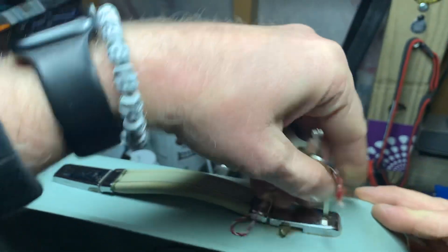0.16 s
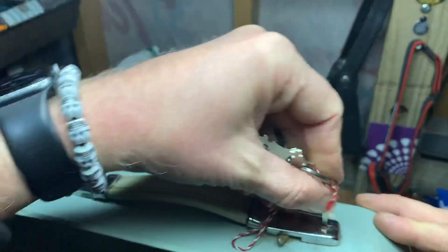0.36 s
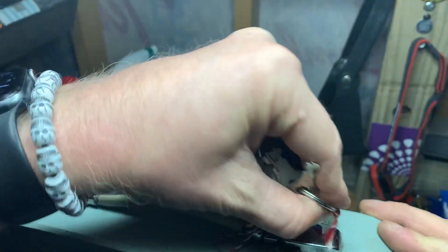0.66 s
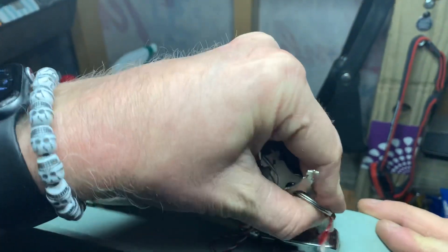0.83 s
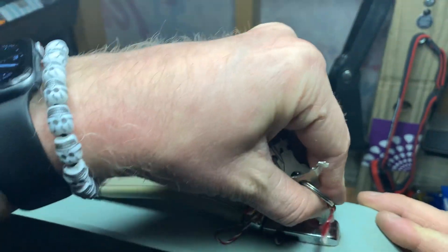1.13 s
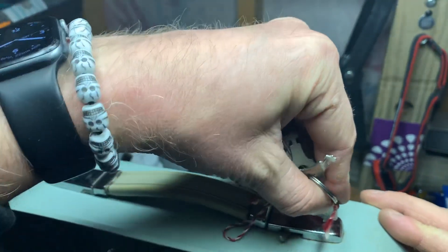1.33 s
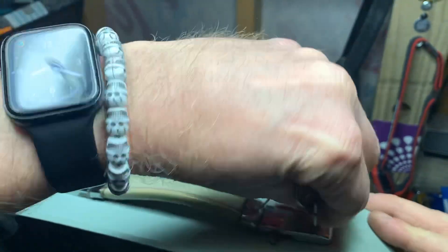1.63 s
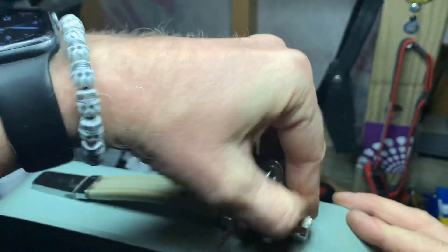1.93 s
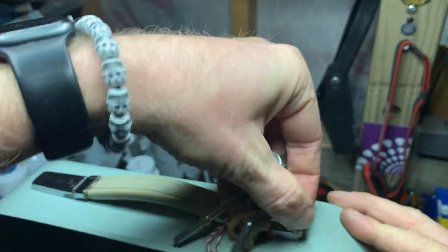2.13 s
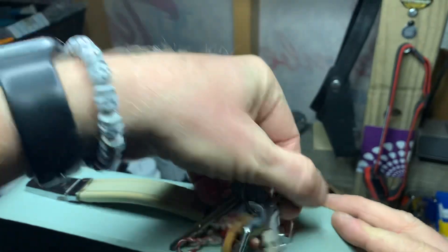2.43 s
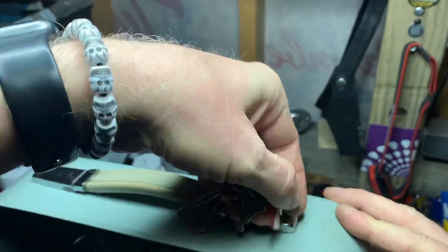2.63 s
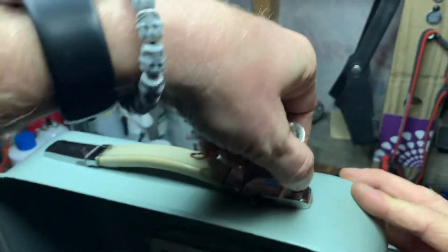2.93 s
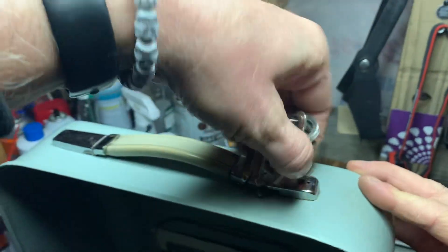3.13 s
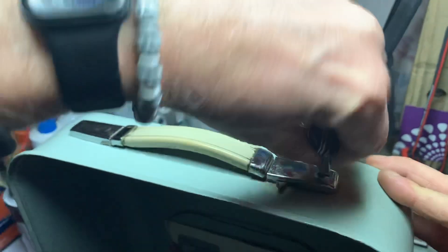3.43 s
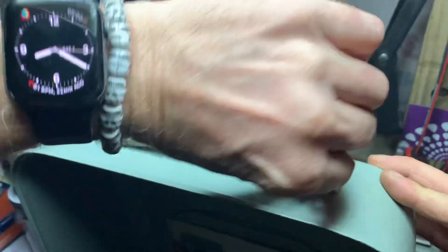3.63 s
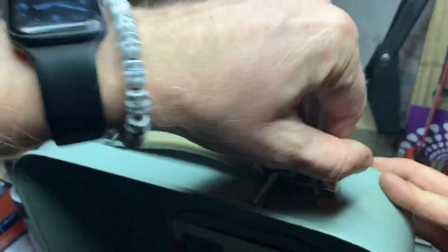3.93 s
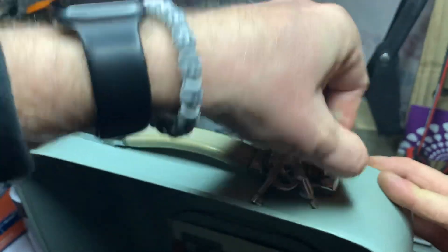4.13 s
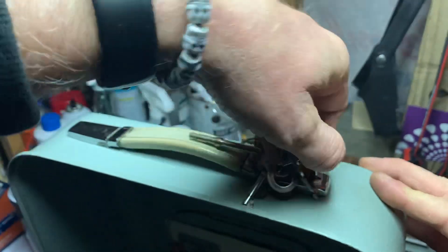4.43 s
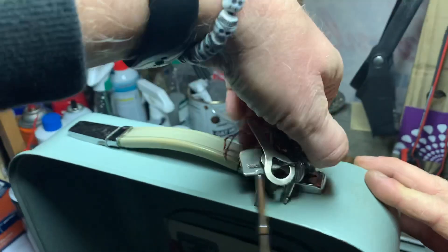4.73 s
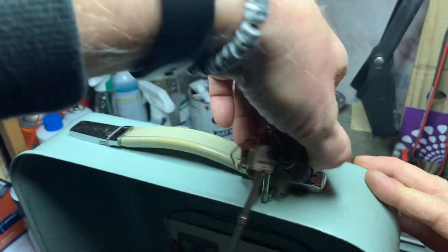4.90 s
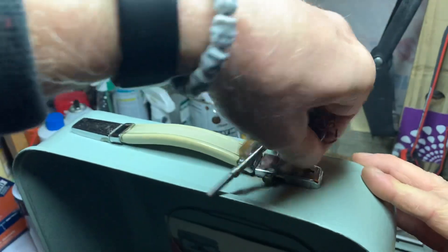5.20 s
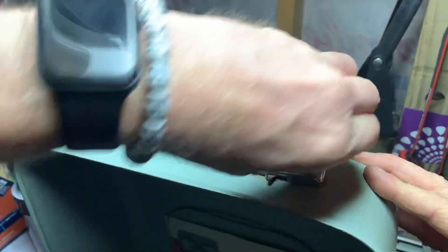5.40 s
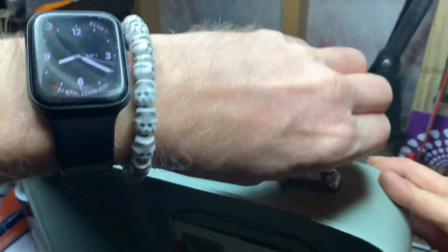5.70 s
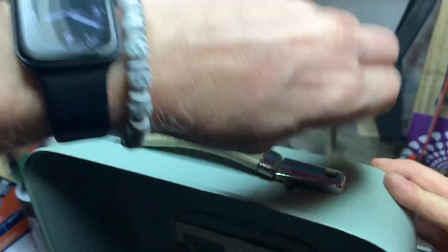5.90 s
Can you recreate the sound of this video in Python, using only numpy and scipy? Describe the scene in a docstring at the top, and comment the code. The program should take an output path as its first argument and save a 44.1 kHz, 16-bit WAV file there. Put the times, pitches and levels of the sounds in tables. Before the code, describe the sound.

A small key on a jangling bunch is worked in the metal lock of a hollow case, faint at first, then clattering and scraping.

```python
"""In a small room, close by, a small key on a bunch is worked in the metal lock of a hollow hard-shell case.
Each contact cracks, rings the lock plate and thumps the shell: bursts of noise and fading tones make these.
Between contacts the keys scrape, swing against each other and drag over the lid: random tiny
impulses and rattles keep the same bodies ringing. Short squeaks, clicks and pings join in.
The room adds a short tail, over a low steady rumble."""
import sys
import numpy as np
from scipy import signal
from scipy.fft import rfft, irfft
from scipy.io import wavfile
from scipy.ndimage import uniform_filter1d

SR = 44100
rng = np.random.default_rng(int(sys.argv[2]) if len(sys.argv) > 2 else 0)


def inscribe(sig):
    """Save sig as 16-bit PCM at rate SR to the path in sys.argv[1].

    A 1-D sig is mono; a 2-D sig holds one channel per row.
    Samples are clipped to [-1, 1] before scaling.
    """
    pcm = np.round(np.clip(np.atleast_2d(sig).T, -1, 1) * 32767)
    wavfile.write(sys.argv[1], SR, pcm.astype(np.int16))


N = 267113

# colour of ringing metal when it is hit: pitch_hz [Hz], relative level_db [dB per Hz]
CRACK = [(600, -14), (1800, -6), (2600, 6), (3300, 0), (4400, 6.5), (6300, 2), (8000, -9.5), (11000, -10.5),
         (16000, -29.5)]
# colour of its highest, glassy part: pitch_hz [Hz], relative level_db [dB per Hz]
GLINT = [(3000, -54.5), (6000, 1.5), (8000, 13), (10300, 8.5), (12000, 5.5), (13700, 2), (14600, 3),
         (15550, -11.5), (16200, -11)]
# the hanging keys by letter, each with its own ringing tones before any added damping or spread:
# pitch_hz [Hz], relative level_db [dB], t60_s, the time to fade by 60 dB [s]
FREE_KEYS = {"A": [(8200, -10.5, 0.13), (10070, -5.5, .1), (10490, -10, .1), (15550, 1.5, 0.08)],
             "B": [(8350, -21, 0.12), (9090, -10, .12), (10000, -10.5, 0.14), (11000, 2, 0.19),
             (13600, -6, 0.2), (14450, -1, 0.23)], "C": [(6525, -14, 0.31), (8156, -11, .3),
             (10060, -7.5, 0.17), (10430, -0.5, 0.21), (13460, -17, 0.11), (14530, -3, 0.18)],
             "D": [(6360, -2, 0.064), (8030, -2.5, 0.14), (12400, -9, .12), (12920, -8.5, 0.12),
             (14500, 2, 0.077), (15500, -3.5, .08)], "E": [(4619, -6, .3), (7241, -10, 0.37),
             (8830, -2.5, 0.1), (11800, -3.5, 0.22), (12600, 0, 0.33)], "F": [(3580, -2, 0.076),
             (7500, 0, 0.51), (12940, -1, .1), (15470, 7.5, 0.075)], "G": [(3790, -1, 0.14),
             (4590, -3, 0.15), (7235, -8, 0.29), (12540, -3.5, 0.18), (14870, -8.5, .24)]}

RING = np.arange(SR // 4) / SR  # time within one ring, s
GRIP_DETUNE = .011  # random pitch spread of plate and shell, as a fraction


def amp(db):
    """Turns decibels into a gain."""
    return 10 ** (np.asarray(db) / 20)


def unit(x):
    """Scales each channel to energy 1."""
    return x / np.sqrt(np.sum(x ** 2, -1, keepdims=True) + 1e-20)


def read(points, hz, axis=1):
    """Reads one column of a table, joined by straight lines over log frequency."""
    columns = np.transpose(points)
    return np.interp(np.log(hz + 1), np.log(columns[0]), columns[axis])


def add(mix, s, sound):
    """Adds a two-channel sound to the mix at time s, in seconds."""
    part = mix[:, max(round(s * SR), 0):][:, :sound.shape[1]]
    part += sound[:, :part.shape[1]]


def blow(db):
    """Size of a blow whose energy equals 10 ms at this level."""
    return amp(db) * np.sqrt(SR / 100)


def noise(spectrum, size, uneven_db=0):
    """Two channels of coloured noise; uneven_db lays random humps over the spectrum."""
    hz = np.fft.rfftfreq(size, 1 / SR)
    humps = np.interp(hz, np.linspace(0, SR / 2, 96), rng.standard_normal(96))
    gain = amp(read(spectrum, hz) + uneven_db * humps)
    return irfft(rfft(rng.standard_normal((2, size))) * gain, size)


def burst(spectrum, t60, rise, uneven_db):
    """Fading noise, like the many crowded, quickly damped tones of a small part; energy 1."""
    envelope = amp(-60 * RING / t60) * (1 - np.exp(-RING / rise))
    return unit(noise(spectrum, len(RING), uneven_db) * envelope)


def struck(modes, scatter_db, rise, detune=0):
    """A body rings; the place of the blow changes each tone's share, the grip its pitch; energy 1."""
    hz, db, t60 = np.transpose(modes)
    hz = hz * (1 + detune * rng.standard_normal(len(hz)))
    level = amp(db + scatter_db * rng.standard_normal(len(hz)))
    weight = level * np.exp(2j * np.pi * rng.random((2, len(hz))))  # each channel has its own phases
    angle = np.float32(2 * np.pi * np.outer(hz, RING))
    fade = np.exp(np.float32(-np.log(1000) * np.outer(1 / t60, RING)))
    ring = weight.real @ (fade * np.cos(angle)) + weight.imag @ (fade * np.sin(angle))
    return unit(ring * (1 - np.exp(-RING / rise)))


def knocks():
    """A knock cracks and rings the plate at once; the shell thumps just after."""
    # the key or the bunch knocks on the lock: start_s [s], blow on the lock plate plate_db [dB],
    # metal crack crack_db [dB], thump of the shell shell_db [dB]
    knock_list = [(0.565, -41, -70, -47.5), (0.7519, -41, -38, -34.5), (0.7661, -33, -34, -33.5),
                  (1.403, -65, -92, -61.5), (1.6015, -48, -54, -47), (1.6652, -44.5, -85, -80),
                  (2.1986, -29.5, -37, -36), (2.2184, -22, -27, -28), (2.2755, -34.5, -45.5, -36.5),
                  (2.338, -33.5, -29, -42), (2.457, -21, -28, -28), (2.598, -31, -45, -30),
                  (3.1238, -41, -51, -43), (3.306, -32, -39, -27), (3.469, -42, -52, -39),
                  (3.671, -41.5, -55.5, -37), (3.866, -54, -21.5, -28), (3.9, -25, -28, -31),
                  (3.926, -29.5, -35, -40), (4.273, -29, -29.5, -42.5), (4.47, -36, -37, -34.5),
                  (4.6483, -15.5, -24.5, -26.5), (4.7008, -22.5, -38, -40), (4.7416, -37.5, -37, -47.5),
                  (4.712, -23, -32.5, -23.5), (4.752, -27.5, -38, -48), (4.83, -32.5, -60, -35),
                  (5.259, -36, -45.5, -37.5), (5.0654, -28, -36.5, -29.5), (5.1212, -19.5, -21, -35.5),
                  (5.1498, -31, -27.5, -31.5), (5.418, -21, -25.5, -27), (5.5869, -28.5, -30, -29.5),
                  (5.7302, -44.5, -75.5, -39), (5.7906, -31, -31, -26), (5.8225, -31.5, -34, -40)]
    bright_db, shell_lag_s = -13, 0.00407  # glint relative to crack; the shell follows the plate
    out = np.zeros((2, N))
    for s, plate_db, crack_db, shell_db in knock_list:
        metal = metal_hit(bright_db, rise_s=0.002, crack_t60=0.06, glint_t60=0.06)
        add(out, s, blow(crack_db) * metal + blow(plate_db) * lock_ring())
        add(out, s + shell_lag_s, blow(shell_db) * shell_ring())
    return out


def metal_hit(bright_db, rise_s, crack_t60, glint_t60):
    """Metal hits metal: a sharp snap, its ringing crack and a high glint, with ringing keys."""
    low, high = key_ring()
    snap = amp(-3) * burst(CRACK, t60=.024, rise=.0015, uneven_db=4)
    ringing = amp(-1.5) * burst(CRACK, t60=crack_t60, rise=rise_s, uneven_db=10.5)
    crack = snap + ringing + amp(-9.5) * low
    glint = amp(-2.5) * burst(GLINT, t60=glint_t60, rise=rise_s, uneven_db=1.0) + amp(-24.5) * high
    return crack + amp(bright_db) * glint


def key_ring():
    """One key of the bunch rings: its low tones and its high tones, each group of energy 1."""
    # tones of the keys held in the hand, before a random pitch shift:
    # pitch_hz [Hz], relative level_db [dB], t60_s [s]
    key_modes = [(2690, -0.5, .03), (3617, 5.5, 0.037), (4340, 1.5, 0.062), (4470, 1.5, 0.056),
                 (4640, 7.5, 0.034), (5600, 7.5, 0.013), (6100, 1.5, 0.071), (6550, -2.5, 0.099),
                 (7900, 6.5, 0.06), (8370, 15, 0.11), (7900, 14, 0.04), (8800, 8, .06), (8850, 14, 0.06),
                 (9800, 0.5, 0.07), (10230, -2, .07), (10220, 6.5, .07), (12290, 6.5, 0.065),
                 (12700, 0, 0.15), (14560, -1.5, 0.08), (15530, -2, 0.046)]
    modes = np.array(key_modes) * [rng.uniform(.97, 1.03), 1, 1]
    high = modes[:, 0] > 7200
    return [struck(modes[part], scatter_db=4.5, rise=.0007) for part in (~high, high)]


def lock_ring():
    """The lock plate's tones, with the dense clatter of its loose parts."""
    # tones of the lock plate, before random spread: pitch_hz [Hz], relative level_db [dB], t60_s [s]
    plate_modes = [(735, -18, 0.22), (953, 0, 0.14), (1003.4, -4.5, 0.12), (1061, 4, 0.1), (1170, 3, 0.086),
                   (1228, 7, 0.082), (1307, 3.5, 0.1), (1630, 3.5, 0.022), (1785, -5, 0.09),
                   (2096, -5, 0.091)]
    # colour of the loose parts: pitch_hz [Hz], relative level_db [dB per Hz]
    clatter = [(300, -13.5), (700, 1.5), (1100, -4), (1550, 0), (2100, -2.5), (3000, -4), (6000, -28)]
    plate = struck(plate_modes, scatter_db=3, rise=.002, detune=GRIP_DETUNE)
    loose = burst(clatter, t60=.07, rise=.005, uneven_db=4)
    return amp(-3.0) * plate + amp(-6.0) * loose


def shell_ring():
    """The hollow shell answers more slowly than the metal."""
    # tones of the shell, before random spread: pitch_hz [Hz], relative level_db [dB], t60_s [s]
    shell_modes = [(105, -21, 0.075), (142.7, -7.5, 0.28), (212.5, 3.5, 0.16), (221.4, 1.5, 0.12),
                   (254.7, -7, 0.1), (326.3, -2.5, 0.15), (392.2, 3, 0.22), (448.2, 6.5, 0.12),
                   (510, -8, 0.22), (560.6, 6, 0.082), (570, -6.5, 0.058), (673.6, -5.5, 0.18)]
    return struck(shell_modes, scatter_db=3, rise=.004, detune=GRIP_DETUNE)


def shove(force):
    """How hard a light force on the lock plate moves the shell."""
    return amp(-14) * force ** 0.77  # a power below 1, so the shell also answers a light touch


def ticks():
    """Key ticks against key; a little of the blow passes through the key into plate and shell."""
    # start_s [s], level_db of the crack [dB], bright_db of the glint relative to it [dB]
    tick_list = [(0.086, -61, 7.5), (0.117, -55, -16), (0.1384, -49.5, 3), (0.256, -56.5, 10),
                 (0.306, -57.5, -1), (0.343, -57, 6.5), (0.4514, -44, 3), (0.475, -59, 12),
                 (0.5066, -48, 3.5), (0.593, -58, 11.5), (0.767, -39.5, 10), (1.5526, -57.5, -12),
                 (2.2198, -31, -1), (2.453, -34, -7), (2.094, -56.5, 13.5), (2.1256, -61.5, 9),
                 (2.1863, -51.5, 7), (2.2835, -49.5, 4), (2.5006, -48, 12), (2.315, -41, 6.5),
                 (2.37, -32.5, -3), (2.405, -30.5, -0.5), (2.5968, -33, 6), (2.648, -42, 8.5),
                 (2.846, -50, 2), (2.866, -52.5, 8), (2.962, -49, -3.5), (3.032, -58.5, 10),
                 (3.2208, -42.5, 11.5), (3.3019, -39.5, 12.5), (3.3461, -39.5, 10.5), (3.4031, -45.5, 8),
                 (3.433, -52.5, 1), (3.544, -47, -0.5), (3.605, -52, -5.5), (3.825, -30.5, 0.5),
                 (3.8437, -26, 2.5), (3.8568, -27, -5.5), (3.8902, -24.5, -5.5), (3.909, -32, 9),
                 (3.956, -31.5, 5), (4.067, -35, -1), (4.138, -46.5, 3), (4.2633, -33.5, -1),
                 (4.3385, -38, 5), (4.3493, -32.5, 9.5), (4.587, -43, -4.5), (4.9315, -46, -10),
                 (4.9554, -37.5, 6), (5.017, -43.5, 8), (5.052, -46.5, 9), (5.1047, -34.5, -9.5),
                 (5.1586, -37, 6.5), (5.3464, -35, 3.5), (5.458, -53, 16), (5.5678, -40.5, 5),
                 (5.9018, -44.5, 5.5)]
    plate_share_db = -8  # share of a tick that reaches the lock plate
    out = np.zeros((2, N))
    for s, db, bright_db in tick_list:
        force = amp(db + plate_share_db)
        case = blow(0) * (force * lock_ring() + shove(force) * shell_ring())
        metal = metal_hit(bright_db, rise_s=0.003, crack_t60=0.1, glint_t60=0.029)
        add(out, s, blow(db) * metal + case)
    return out


def sliding():
    """The touch hops from point to point; each slips and rings keys, plate and shell in its own colour."""
    slips_per_s, contact_s = 270, .05  # contact_s: time spent at one point
    scrape, glint, drag = stroke_forces()
    catches = slips(slips_per_s, spread_db=4)
    rubbing = slips(4 * slips_per_s, spread_db=2.5)
    forces = np.array([scrape * catches, glint * catches, drag * rubbing, shove(drag) * rubbing])
    out, step = np.zeros((2, N)), round(contact_s * SR)
    for at in range(0, N, step):
        low, high = key_ring()
        rasp = amp(-5.5) * burst(CRACK, t60=.022, rise=.0005, uneven_db=5) + amp(-7) * low
        fizz = amp(-4.5) * burst(GLINT, t60=.015, rise=.0003, uneven_db=6) + amp(-3.0) * high
        bodies = np.array([rasp, fizz, lock_ring(), shell_ring()])
        # each force plays the body of the same row
        add(out, at / SR, signal.fftconvolve(forces[:, None, at:at + step], bodies, axes=2).sum(0))
    return out


def stroke_forces():
    """Scrape, glint and drag over time: a stroke swells, eases off and dies away; strokes add in power."""
    # the bunch slides: start_s at full strength [s], length_s [s], scrape of key on key scrape_db [dB],
    # glint relative to the scrape bright_db [dB], drag on the lock plate drag_db [dB]
    strokes = [(0, 0.017, -78, -6, -59.5), (0.713, 0.15, -66, -4, -66.5), (1.466, 0.53, -75.5, -7, -67),
               (0.112, 0.31, -67, -1, -62.5), (0.484, 0.085, -55.5, -3.5, -63.5),
               (1.538, 0.15, -63, 3.5, -58.5), (1.867, 0.022, -42, 18, -40.5), (1.934, 0.1, -40, 0, -39),
               (2.055, 0.1, -55.5, 4, -51), (2.313, 0.062, -51, 0.5, -39),
               (2.382, 0.014, -32.5, -3.5, -31.5), (2.502, 0.13, -47, 0, -46.5),
               (2.561, 0.027, -38, -1, -39.5), (2.594, 0.024, -28.5, 0, -33), (2.71, 0.84, -63.5, 1.5, -58),
               (3.122, 0.086, -57.5, 4.5, -52.5), (3.336, 0.0072, -39.5, 2, -45.5),
               (3.383, 0.71, -63, -3, -61.5), (3.796, 0.025, -47, 4, -46), (3.851, 0.081, -23, 3, -33.5),
               (3.972, 0.018, -23, -5, -29), (4.033, 0.075, -41.5, -1, -40.5),
               (4.152, 0.21, -44.5, -5, -47), (4.357, 0.029, -35, -1, -38), (4.447, 0.15, -42, -13, -42),
               (4.511, 0.1, -40, 0, -44), (4.678, 0.1, -35, -12, -24.5), (4.75, 0.15, -42, -13.5, -37),
               (4.956, 0.052, -31.5, -3.5, -30.5), (5.07, 0.19, -44.5, -23, -34),
               (5.148, 0.039, -29, -11.5, -35.5), (5.378, 0.055, -35.5, -10.5, -39),
               (5.477, 0.2, -66.5, -1, -55), (5.775, 0.056, -46, -18, -50),
               (5.867, 0.081, -60, 10.5, -63.5)]
    rise_db_per_s, sag_db, release_db_per_s = 596, 5.5, 329.5
    time = np.arange(N) / SR
    power = np.zeros((3, N))
    for start, length, scrape_db, bright_db, drag_db in strokes:
        t = time - start
        swell_db = rise_db_per_s * np.minimum(t, 0)
        fade_db = sag_db * np.clip(t / length, 0, 1) + release_db_per_s * np.maximum(t - length, 0)
        levels = amp([scrape_db, scrape_db + bright_db, drag_db])
        power += np.outer(levels, amp(swell_db - fade_db)) ** 2
    return np.sqrt(power)


def slips(per_s, spread_db):
    """Stick and slip: random tiny impulses of uneven size, with an average (rms) level of 1."""
    size = amp(spread_db * np.minimum(rng.exponential(1, N), 4))
    happens = rng.random(N) < per_s / SR
    return unit(size * happens) * np.sqrt(N)


def clinks():
    """A struck hanging key chatters against its neighbours, which damp it; part of it sings on freely."""
    # start_s [s], key (a letter of FREE_KEYS), relative level_db [dB]
    clink_list = [(1.821, "A", -33), (1.838, "A", -37), (1.856, "A", -33), (1.8645, "B", -27.5),
                  (1.9495, "A", -34), (1.951, "C", -25), (1.985, "D", -32), (2.3166, "A", -34),
                  (2.385, "D", -25), (2.556, "D", -34), (2.575, "D", -35), (2.594, "D", -29),
                  (2.621, "D", -29.5), (3.894, "A", -19), (3.911, "D", -25), (3.955, "E", -21.5),
                  (4.009, "D", -26.5), (4.042, "D", -40), (4.137, "D", -39), (4.1848, "D", -31),
                  (4.21, "D", -25), (4.262, "E", -34.5), (4.271, "F", -24), (4.339, "D", -23),
                  (4.351, "A", -28.5), (4.468, "A", -31), (4.514, "D", -25), (4.522, "F", -31.5),
                  (4.573, "A", -39.5), (4.699, "G", -21.5), (4.8533, "G", -39.5), (4.9284, "G", -35.5)]
    damping, chatter_t60, free_ring_db = .11, .12, -2.5  # factor on t60; s; free ring against rattle
    out = np.zeros((2, N))
    for s, key, db in clink_list:
        modes = np.array(FREE_KEYS[key])
        damped = struck(modes * [1, 1, damping], scatter_db=2, rise=.0002, detune=.008)
        contact = damped + amp(-7) * burst(GLINT, t60=.01, rise=.0002, uneven_db=4)
        # cubing the noise leaves a few strong hits among many weak ones
        chatter = rng.standard_normal((1, len(RING))) ** 3 * amp(-60 * RING / chatter_t60)
        rattle = unit(signal.fftconvolve(chatter, contact, axes=1)[:, :len(RING)])
        free = struck(modes, scatter_db=2, rise=.0002, detune=.0005)
        add(out, s, blow(db) * amp(-4.0) * (rattle + amp(free_ring_db) * free))
    return out


def booms():
    """A hard shove sets one panel of the hollow shell going: it swells and dies on one tone."""
    # start_s [s], level_db [dB], pitch_hz [Hz], t60_s [s]
    boom_list = [(0.762, -24, 210.6, 0.17), (.772, -32, 673, 0.087), (0.769, -43, 119.8, 0.5),
                 (3.313, -31, 214, 0.03), (5.592, -37.5, 210, 0.09), (5.797, -27.5, 230, 0.017),
                 (5.798, -25.5, 396.8, 0.31), (5.8, -28.5, 452, 0.27)]
    out = np.zeros((2, N))
    for s, db, hz, t60 in boom_list:
        add(out, s, blow(db) * struck([(hz, 0, t60)], scatter_db=0, rise=.005))
    return out


def squeaks():
    """A fingertip chirps on metal, gliding in pitch; the grip trembles, which roughens the pitch."""
    # start_s [s], level_db [dB], first_hz and last_hz before the roughening [Hz], length_s [s]
    squeak_list = [(0.749, -44, 1215, 1230, 0.017), (.769, -37, 1248, 1250, 0.013),
                   (3.769, -40, 1720, 1490, 0.015)]
    jitter = .2  # typical pitch wobble, as a fraction
    out = np.zeros((2, N))
    for s, db, first_hz, last_hz, length in squeak_list:
        glide = np.geomspace(first_hz, last_hz, round(length * SR))
        tremble = uniform_filter1d(rng.standard_normal(len(glide)), size=36) * np.sqrt(36)
        hz = glide * (1 + jitter * tremble)
        chirp = amp(db) * 2 * np.hanning(len(hz)) * np.sin(2 * np.pi * np.cumsum(hz) / SR)
        add(out, s, np.array([chirp, chirp]))
    return out


def snaps():
    """An edge slips off and lands: one very short hard click."""
    # start_s [s], level_db [dB]
    snap_list = [(2.4581, -29), (2.597, -38), (2.6051, -36), (3.8437, -27), (3.8503, -29), (3.858, -22.5),
                 (3.869, -22.5), (3.912, -30), (4.713, -43), (5.171, -36), (5.427, -33.5)]
    out = np.zeros((2, N))
    for s, db in snap_list:
        click = sum(burst(colour, t60=.007, rise=.0001, uneven_db=3) for colour in (CRACK, GLINT))
        add(out, s, blow(db) * unit(click))
    return out


def pings():
    """A pinched key rings briefly on a cluster of close tones."""
    # start_s [s], level_db [dB], middle pitch_hz [Hz]
    ping_list = [(2.458, -23, 5200), (2.458, -26, 6120), (3.8888, -26, 3900), (3.8955, -25, 8080),
                 (3.909, -21, 12300), (4.2118, -36.5, 8000), (4.2623, -36, 6330), (4.339, -27.5, 6540),
                 (4.3493, -26, 8400), (4.394, -32, 6230)]
    # the tones of one ping: pitch ratio to the middle one, relative level_db [dB]
    cluster = [(.95, -4), (1, 0), (1.06, -5.5)]
    t60_s = .03
    out = np.zeros((2, N))
    for s, db, hz in ping_list:
        modes = [(hz * ratio, level, t60_s) for ratio, level in cluster]
        add(out, s, blow(db) * struck(modes, scatter_db=1, rise=.0004))
    return out


def shimmer():
    """Hanging keys buzz against each other: a dense patter keeps their tones ringing."""
    # start_s [s], length_s [s], key (a letter of FREE_KEYS), relative level_db at the start [dB]
    shivers = [(1.819, .11, "A", -44), (1.868, 0.092, "B", -43), (1.947, 0.062, "C", -41.5)]
    sag_db, damping = 7.5, .4  # drop over one shiver; factor on t60
    out = np.zeros((2, N))
    for s, length, key, db in shivers:
        t = np.arange(round(length * SR)) / SR
        patter = rng.standard_normal((1, len(t))) * amp(-sag_db * t / length)
        ringing = struck(np.array(FREE_KEYS[key]) * [1, 1, damping], scatter_db=1, rise=.0002)
        body = ringing + amp(-9) * burst(GLINT, t60=.03, rise=.0003, uneven_db=3)
        add(out, s, amp(db) * signal.fftconvolve(patter, body, axes=1))
    return out


def room(x):
    """A short diffuse tail, made of fading noise; the treble dies first."""
    # how long the room rings: pitch_hz [Hz], t60_s [s]
    room_t60 = [(150, 0.41), (500, 0.3), (1200, 0.25), (5000, 0.16), (15000, 0.075)]
    hz, t, z = signal.stft(rng.standard_normal((2, SR // 2)), SR, nperseg=256)
    fade = amp(-60 * t / read(room_t60, hz)[:, None])
    tail = signal.istft(z * fade, SR, nperseg=256)[1]
    tail *= 1 - np.exp(-np.arange(tail.shape[1]) / SR / 0.0009)  # soft start
    return signal.fftconvolve(x, unit(tail), axes=1)[:, :N]


def rumble():
    """A low steady rumble: coloured noise with an average (rms) level of 1."""
    # colour of the rumble: pitch_hz [Hz], relative level_db [dB per Hz]
    room_tone = [(15, -28), (32, -20), (52, 4), (80, 0), (125, -1.5), (400, -25.5), (700, -27.5),
                 (2000, -41.5), (16000, -44.5)]
    return np.sqrt(N) * unit(noise(room_tone, N))


def scene():
    """Lock and keys in the room, over a low steady rumble."""
    contacts = knocks() + ticks() + sliding()
    near = contacts + clinks() + booms() + squeaks() + snaps() + pings() + shimmer()
    return near + amp(-13.5) * room(near) + amp(-59.0) * rumble()


def record(dry):
    """Two microphone ports hear the bass alike and the treble out of step; the very top is cut off."""
    # the two ports: pitch_hz [Hz], likeness [0-1], lead of left over right [radians],
    # level_db of left minus right [dB]
    ports = [(60, .95, 0, 0.3), (230, .99, -.25, .4), (450, 0.98, -0.35, 0), (740, 0.49, .9, -.5),
             (1030, 0.77, 1, 0.7), (1750, 0.3, 0.3, 0.2), (2700, 0.5, 2.3, 0), (3600, 0.3, 0, 2),
             (5200, .6, 2.9, -1), (6100, 0.4, .5, -4), (7000, .5, .2, 0), (7800, 0.4, -2.5, -3),
             (9200, .6, -4, -1), (9900, 0.8, -6.2, 0), (10800, .9, -6.3, 0), (11400, .9, -9.2, 0),
             (12200, .95, -9.7, 0), (13000, .9, -12, 0), (13700, 0.9, -12.6, 1), (14600, .9, -15.4, 0.5),
             (15600, .85, -16.5, -1)]
    edge_hz = 15950
    hz, (left, other) = np.fft.rfftfreq(N, 1 / SR), rfft(dry)
    alike = np.clip(read(ports, hz, axis=1), 0, 1)
    blend = alike * left + np.sqrt(1 - alike ** 2) * other
    right = blend * np.exp(-1j * read(ports, hz, axis=2))
    lean = amp(read(ports, hz, axis=3) / 2)  # half the difference goes to each side
    pair = irfft(np.array([left * lean, right / lean]), N)
    lowpass = signal.firwin(301, edge_hz, window=("kaiser", 9), fs=SR)
    return signal.oaconvolve(pair, lowpass[None], "same")


dry = scene()
out = record(dry)
inscribe(out)
```